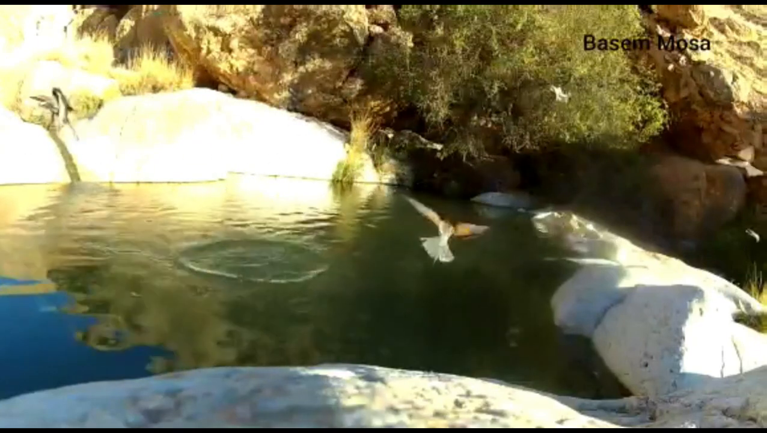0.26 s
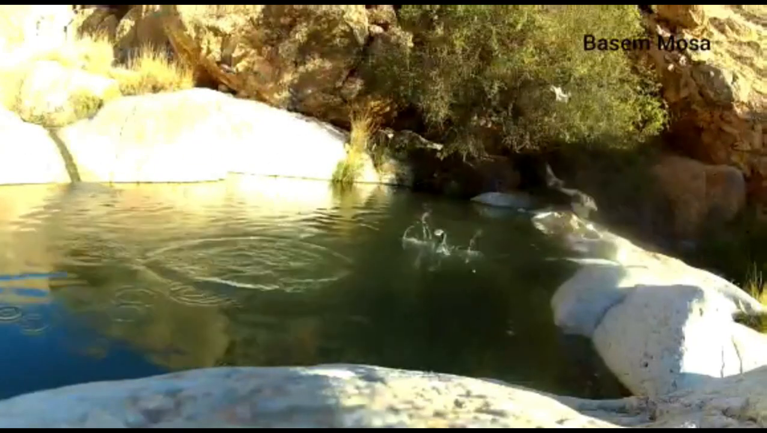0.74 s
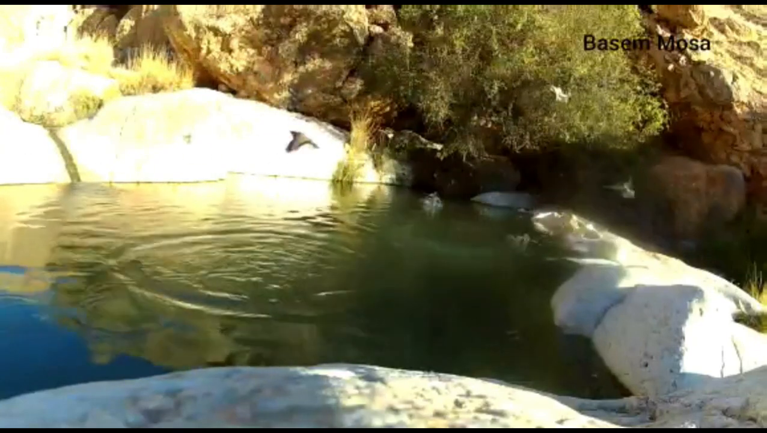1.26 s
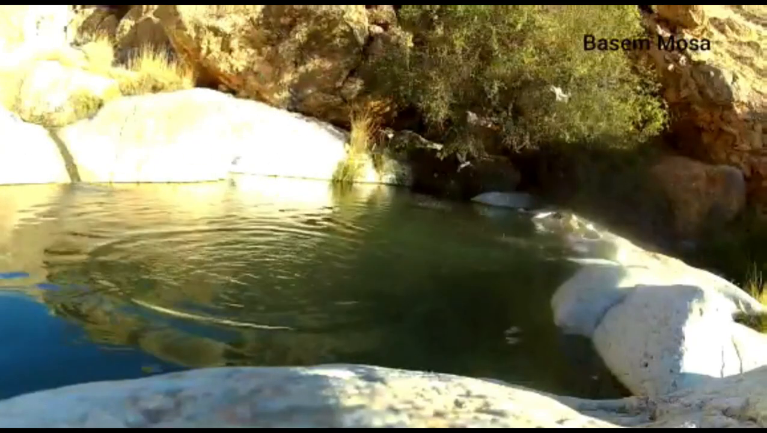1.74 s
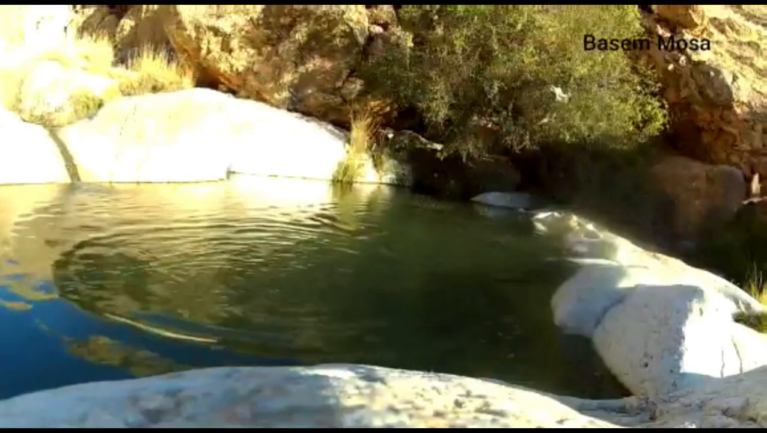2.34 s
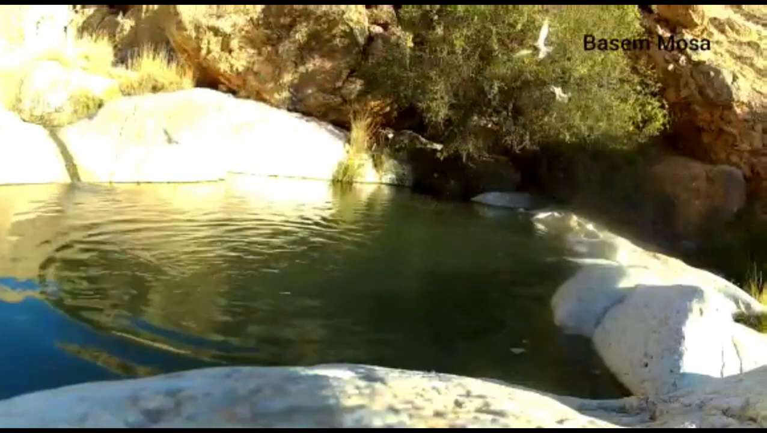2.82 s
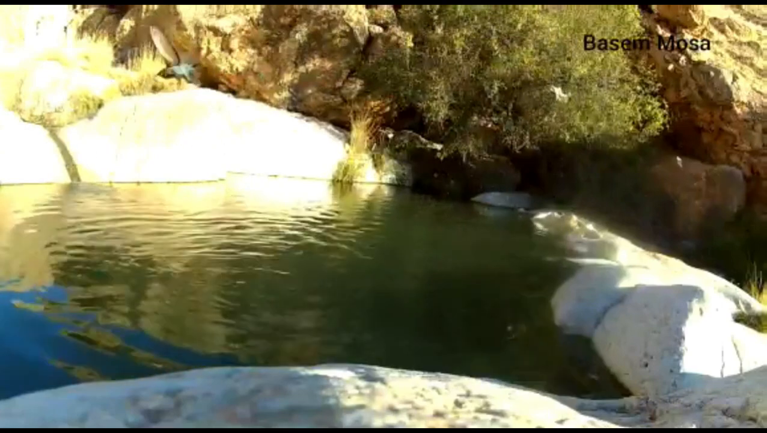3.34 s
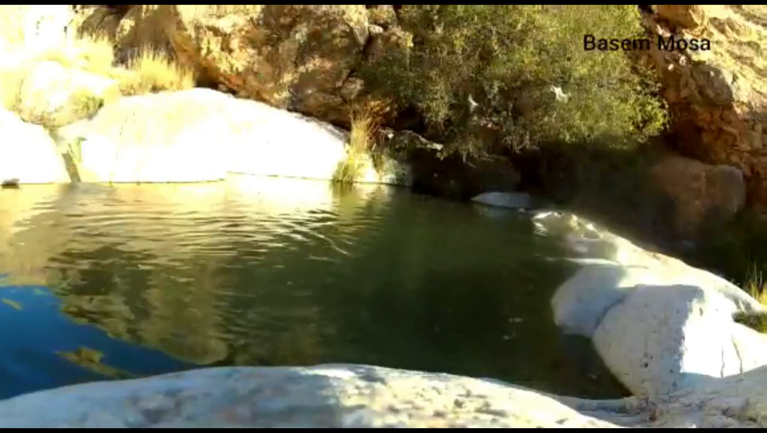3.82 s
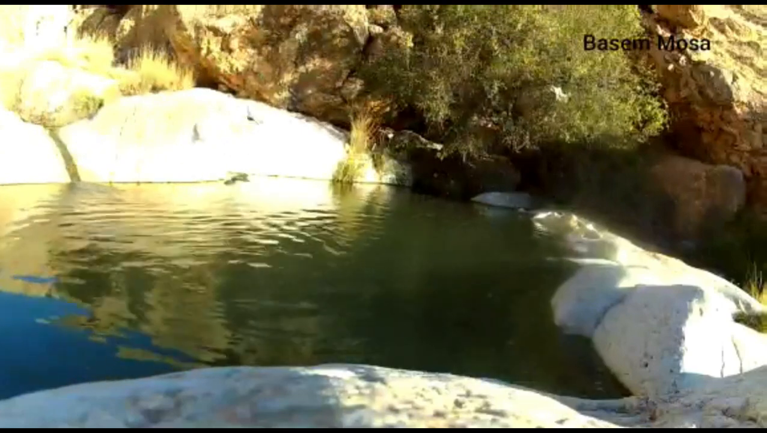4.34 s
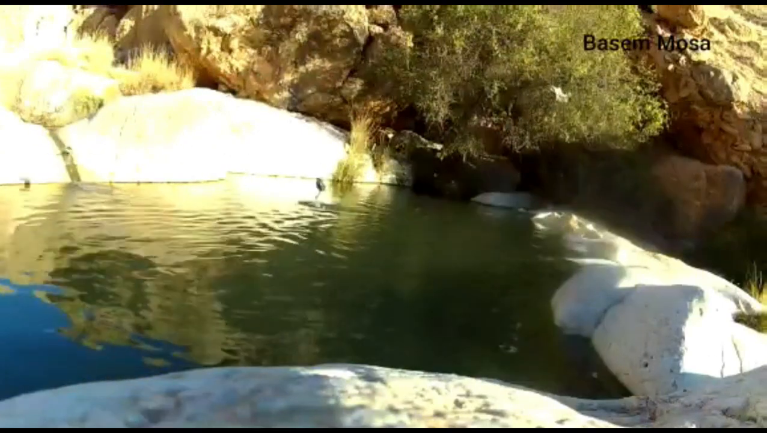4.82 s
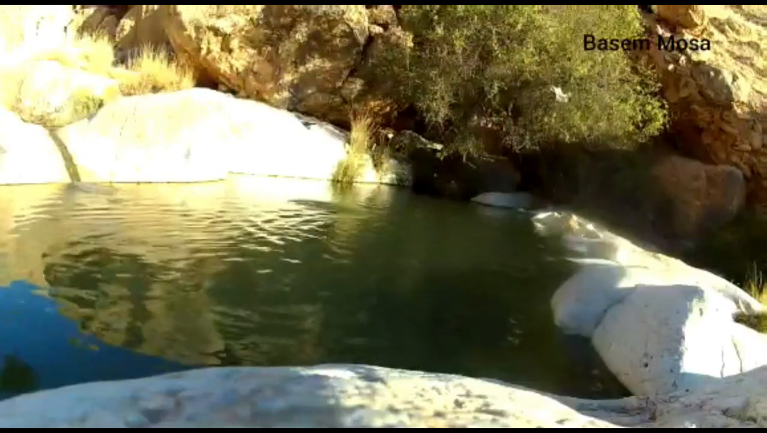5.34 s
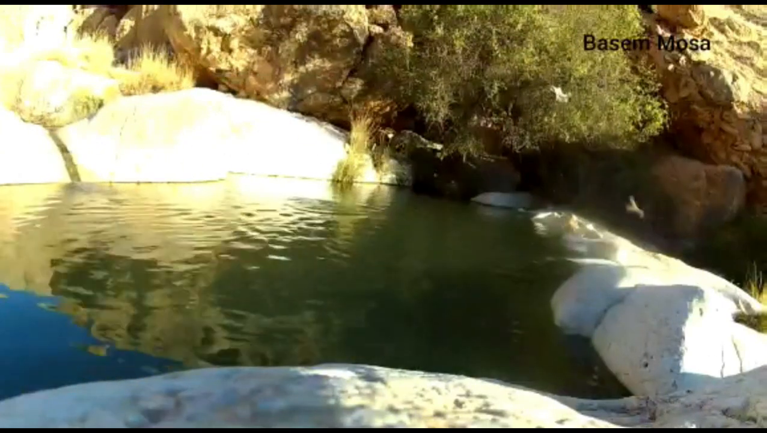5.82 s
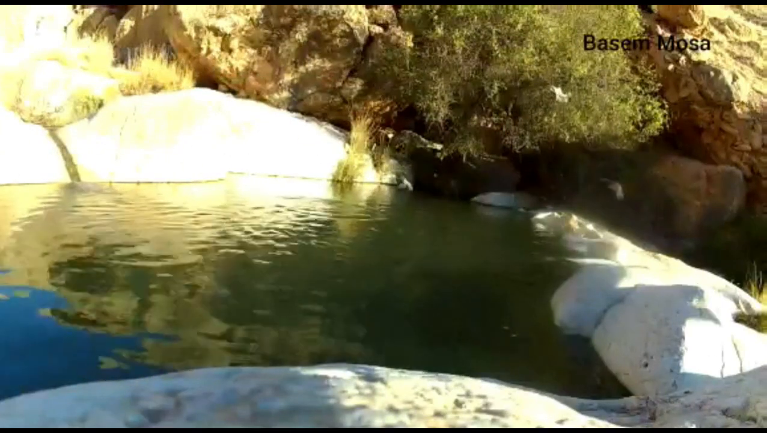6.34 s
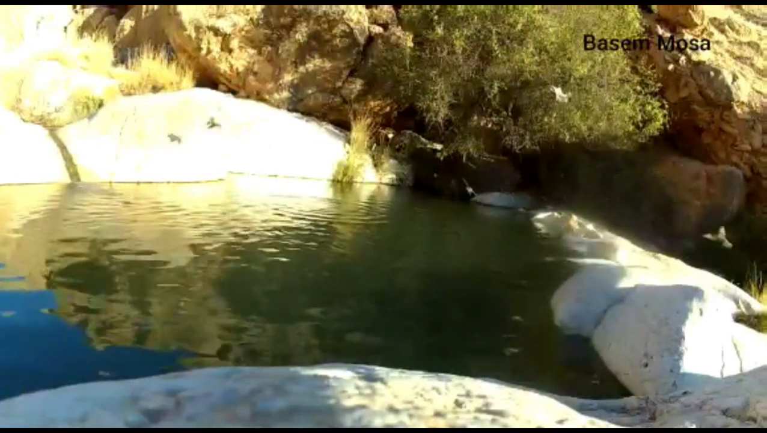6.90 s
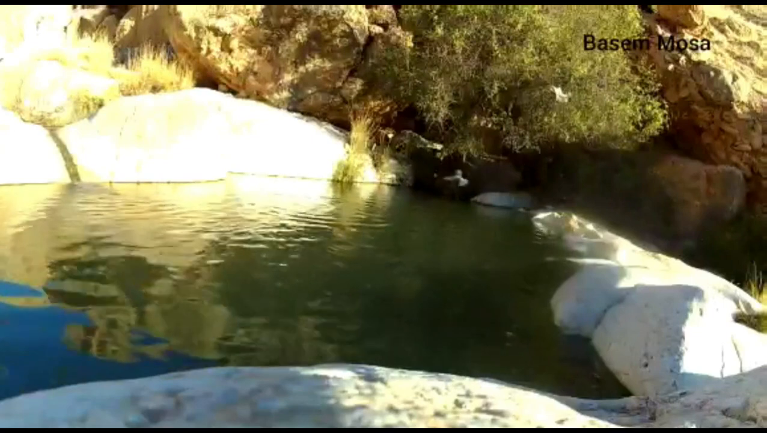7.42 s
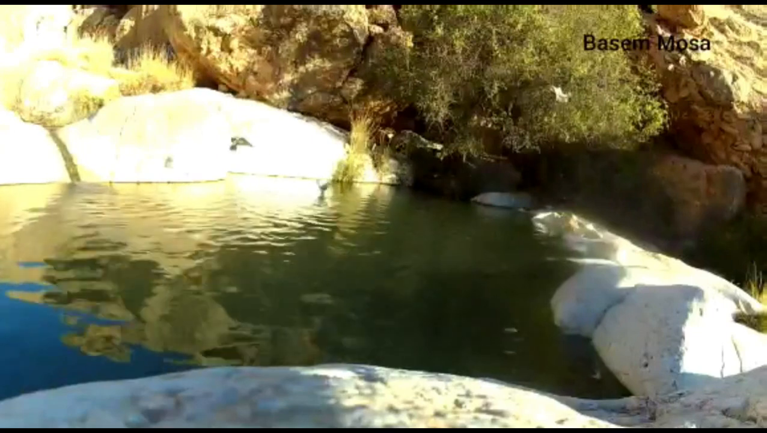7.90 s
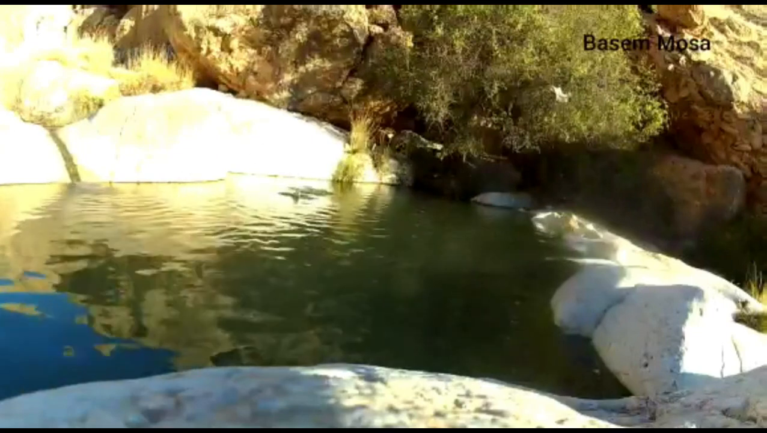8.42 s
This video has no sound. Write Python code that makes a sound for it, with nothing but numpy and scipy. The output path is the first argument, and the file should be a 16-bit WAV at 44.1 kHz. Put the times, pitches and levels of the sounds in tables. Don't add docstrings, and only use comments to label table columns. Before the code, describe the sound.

Brief liquid bird calls, near and far, echo off rocks above a softly rushing, trickling pool with sharp water clicks and microphone hiss.

```python
import sys
import numpy as np
from scipy import signal
from scipy.fft import rfft, irfft, next_fast_len
from scipy.io import wavfile
from scipy.ndimage import uniform_filter1d, map_coordinates

SR = 44100
rng = np.random.default_rng(int(sys.argv[2]) if len(sys.argv) > 2 else 0)


def unload_audio(sound):
    columns = np.transpose(np.atleast_2d(sound))
    steps = np.round(np.clip(columns, -1, 1) * 32767)
    wavfile.write(sys.argv[1], SR, steps.astype(np.int16))


def amplitude_ratio(level_db):
    exponent = np.asarray(level_db, float) / 20
    return 10 ** exponent


N = 381906
T = np.arange(N) / SR

# pitch_hz, gain_db
FLIP_GAIN = [(1500, -12), (1900, 1.5), (2100, -1.5), (2450, 13)]
JUMP_S = .003


def unit(x):
    return x / np.sqrt(np.mean(x ** 2) + 1e-20)


def along(points, hz):
    f, v = np.transpose(points)
    return np.interp(np.log(hz + 1), np.log(f + 1), v)


def wobble(rate, size=N):
    knots = rng.standard_normal(int(size * rate / SR) + 4)
    return map_coordinates(knots, [np.arange(size) * rate / SR])


def add(track, s, x):
    part = track[round(s * SR):][:len(x)]
    part += x[:len(part)]


def band(hz, width, size=N):
    bell = np.exp(-.5 * ((np.fft.rfftfreq(size, 1 / SR) - hz) / width) ** 2)
    return unit(irfft(rfft(rng.standard_normal(size)) * bell, size))


def rush(spectrum, patchy_db, grains=0):
    z = signal.stft(rng.standard_normal(N) + grains, nperseg=512)[2]
    field = uniform_filter1d(rng.standard_normal(z.shape), size=6, axis=0)
    field = uniform_filter1d(field, size=8, axis=1)
    x = signal.istft(z * amplitude_ratio(patchy_db * unit(field)), nperseg=512)[1][:N]
    m = next_fast_len(N + 8192)
    colour = amplitude_ratio(along(spectrum, np.fft.rfftfreq(m, 1 / SR)))
    return unit(irfft(rfft(x, m) * colour, m)[:N])


def wind(strength_db):
    # pitch_hz, level_db (per Hz)
    rumble = [(12, -34), (20, -5.5), (64, -0.5), (130, -7.5), (170, -46), (290, -120)]
    return amplitude_ratio(strength_db + 2.5) * rush(rumble, patchy_db=.3)


def gurgle(lapping_db):
    # pitch_hz, level_db (per Hz)
    slosh = [(76, -27), (130, -2), (221, -1), (279, -1), (308, -1), (354, -13.5), (560, -8.5), (730, -31),
             (1230, -120)]
    mean_db = lapping_db.mean()
    swing_db = 1.25 * (lapping_db - mean_db)
    return amplitude_ratio(swing_db + mean_db + 1.6 + 2.4 * wobble(38)) * rush(slosh, patchy_db=0.05)


def wash(water_db, flutter):
    # pitch_hz, level_db (per Hz)
    water = [(220, -26), (380, -1), (507, -4.5), (610, -2), (661, -2.5), (893, -2), (1610, -3.5),
             (1850, -2.5), (3370, -14), (3960, -16), (6000, -23.5), (7800, -45), (13200, -120)]
    return amplitude_ratio(water_db + 2.5 + 0.42 * flutter + 0.23 * wobble(25)) * rush(water, patchy_db=1.47)


def hollow(water_db):
    # pitch_hz, width_hz, level_db (relative to the water)
    pocket = (1100, 96, -9.5)
    hz, width, db = pocket
    return amplitude_ratio(water_db + db + 3 * wobble(13)) * band(hz, width)


def hiss(hiss_db, flutter):
    # pitch_hz, level_db (per Hz)
    treble = [(2350, -62), (4000, 0), (4750, -8.5), (6930, -6), (8180, -6), (9120, -8), (11700, -7.5),
              (15100, -8.5), (15700, -9.5)]
    spray = (rng.random(N) < 90 / SR) * rng.standard_normal(N) * 6
    sizzle = .2 * flutter + .7 * wobble(24) + .7 * wobble(60)
    return amplitude_ratio(hiss_db + 3.5 + sizzle) * rush(treble, patchy_db=1.6, grains=spray)


def whine():
    # pitch_hz, width_hz, level_db
    tones = [(10020, 8, -83), (13680, 80, -77)]
    return sum(amplitude_ratio(db + 1.5 * wobble(12)) * band(hz, width) for hz, width, db in tones)


def background():
    # time_s, level_db
    breeze = [(0.0, -55), (0.53, -54), (1.88, -56), (2.12, -54), (3.18, -57), (3.62, -56), (3.96, -58),
              (4.85, -59), (4.99, -54), (5.62, -53), (5.76, -58), (6.32, -56), (6.73, -59), (7.07, -56),
              (8.05, -59), (8.66, -55)]
    # time_s, level_db
    waves = [(0.0, -51), (0.58, -53), (1.74, -50), (2.65, -52), (2.87, -56), (3.52, -53), (3.81, -55),
             (4.12, -54), (4.72, -55), (5.5, -52), (6.1, -56), (6.39, -53), (6.49, -55), (8.01, -56),
             (8.47, -52), (8.66, -54)]
    wind_db = np.interp(T, *np.transpose(breeze))
    lapping_db = np.interp(T, *np.transpose(waves))
    water_db = -47.2 + .25 * (lapping_db - lapping_db.mean())
    hiss_db = -60.5 + .25 * (wind_db - wind_db.mean())
    flutter = wobble(9)
    pool = gurgle(lapping_db) + wash(water_db, flutter) + hollow(water_db)
    return wind(wind_db) + pool + hiss(hiss_db, flutter) + whine()


def bubbles(rows, rise, attack):
    out = np.zeros(N)
    for s, db, hz, t60 in rows:
        t = np.arange(round(t60 * SR)) / SR
        shape = amplitude_ratio(db - 60 * t / t60) * (1 - np.exp(-t / attack))
        add(out, s, shape * np.sin(2 * np.pi * hz * t * (1 + rise * t / t60)))
    return out


def circuit_pips():
    # start_s, peak_db, pitch_hz
    pips = [(0.2498, -48, 15600), (0.389, -44, 14400), (1.2351, -47, 15600), (1.4371, -51, 14400),
            (2.2104, -47, 15600), (3.2515, -47, 15600), (3.5374, -51, 14300), (4.1859, -40, 15600),
            (4.4378, -46, 14300), (4.802, -45, 14600), (6.5465, -52, 14400), (7.447, -48, 14300),
            (8.2257, -46, 15700), (8.4876, -51, 14400)]
    return 1.4 * bubbles([(*row, .04) for row in pips], rise=.001, attack=0.0043)


def trickle(count, low_hz, high_hz, cycles, db):
    u = rng.random((count, 3))
    start = u[:, 0] * T[-1]
    hz = low_hz * (high_hz / low_hz) ** u[:, 1]
    level = db + 9 * u[:, 2] ** 2
    return bubbles(np.c_[start, level, hz, cycles / hz], rise=.15, attack=0.0052)


def trickles():
    middle = trickle(count=220, low_hz=503, high_hz=1500, cycles=50, db=-51)
    deep = trickle(count=120, low_hz=164.4, high_hz=604, cycles=25, db=-52)
    mist = trickle(count=400, low_hz=3500, high_hz=15500, cycles=150, db=-65)
    return middle + deep + mist


def plops():
    # start_s, peak_db, pitch_hz, t60_s
    closing = [(3.703, -26, 970, 0.037), (3.932, -35.5, 794, 0.16), (4.012, -32, 575, 0.075),
               (4.036, -29.5, 584, 0.11), (4.69, -33, 247, 0.059), (4.931, -25, 1800, 0.023),
               (4.94, -30, 1050, 0.035), (.17, -30, 1060, 0.053), (1.937, -40, 3700, .015),
               (6.085, -36, 616, .1), (6.21, -34.5, 908, 0.11), (6.58, -32.5, 594, 0.054),
               (6.695, -28, 1300, 0.038), (.721, -29, 3500, 0.017), (1.386, -22, 2410, 0.014),
               (1.484, -31, 3600, 0.012), (1.588, -31, 3580, .011), (1.596, -29, 3150, 0.012),
               (4.075, -40, 790, .07), (8.12, -29, 1750, 0.036), (8.228, -35, 1190, 0.055),
               (5.305, -34, 1090, .06)]
    return bubbles(closing, rise=0.11, attack=0.0027)


def cracks(rows, t60, db):
    out, t = np.zeros(N), np.arange(200) / SR
    for s, level, _ in rows:
        snap = np.diff(rng.standard_normal(len(t) + 1))
        add(out, s, amplitude_ratio(level + db - 60 * t / t60) * snap)
    return out


def droplets():
    # start_s, peak_db, pitch_hz
    ticks = [(0.1027, -44, 9030), (0.4908, -49, 4690), (0.6639, -44, 5760), (0.7178, -45, 4520),
             (0.7696, -37, 8290), (0.8799, -39, 4910), (0.9378, -41, 5060), (1.0555, -43, 6390),
             (1.2306, -43, 4930), (1.3977, -42, 5580), (1.5364, -35.5, 5100), (1.9939, -44, 4820),
             (2.5027, -41, 5370), (3.5034, -41, 4500), (3.7599, -46, 4620), (4.8514, -43, 7040),
             (5.3892, -43, 5810), (6.3769, -40, 8330), (6.4867, -49, 4870), (6.6504, -43, 8660),
             (7.6245, -40, 8080), (8.3439, -40, 4780)]
    rings = 2.0 * bubbles([(*row, .005) for row in ticks], rise=.02, attack=.0003)
    return rings + cracks(ticks, t60=.004, db=-9.5)


def splashes():
    # start_s, length_s, centre_hz, level_db
    touches = [(.58, 0.13, 11000, -66), (0.744, .22, 7600, -60), (0.658, 0.33, 11000, -65),
               (1.42, .1, 11000, -70), (1.504, .32, 6260, -65), (3.47, 0.068, 9000, -62),
               (4.86, 0.15, 6500, -61), (5.622, 0.22, 11000, -65.5), (8.423, 0.14, 9000, -71)]
    out = np.zeros(N)
    for s, length, hz, db in touches:
        size = round(length * SR)
        gain = amplitude_ratio(db + 3 * wobble(70, size)) * np.hanning(size) ** .5
        add(out, s, gain * band(hz, 0.15 * hz, size))
    return out


def flaps():
    # start_s, length_s, level_db
    passes = [
        (.5, .45, -54),
        (1.25, .3, -55),
        (8.305, .25, -50),
    ]
    beats_per_s = 20
    out = np.zeros(N)
    for s, length, db in passes:
        t = np.arange(round(length * SR)) / SR
        beats = 2 * np.sin(np.pi * beats_per_s * t) ** 4
        puffs = beats * band(250, 110, len(t))
        add(out, s, amplitude_ratio(db + 2.5 * wobble(15, len(t))) * puffs)
    return out


def whistle(notes, overtone_db=0, octave_db=-99):
    # pitch_hz, level_db
    throat = [(3000, -38), (4000, -48), (5200, -34.5), (6000, -36.5), (8000, -58), (10000, -45),
              (12000, -54), (14000, -57), (15500, -47)]
    s, length, hz0, hz1, db0, db1 = np.transpose(notes)
    knots = np.maximum.accumulate(np.ravel([s, s + length], "F")) - s[0] + .002
    t = np.arange(round((knots[-1] + 0.0047) * SR)) / SR
    hz = uniform_filter1d(np.interp(t, knots, np.ravel([hz0, hz1], "F")), size=60)
    level_knots = np.r_[db0[0] - 30, np.ravel([db0, db1], "F"), db1[-1] - 30]
    level = np.interp(t, np.r_[0, knots, t[-1]], level_knots)
    shimmer = .3 * wobble(250, size=len(t))
    gain = amplitude_ratio(uniform_filter1d(level, size=30) + shimmer)
    phase = 2 * np.pi * np.cumsum(hz) / SR
    tone = np.sin(phase) + amplitude_ratio(octave_db) * np.sin(2 * phase)
    for k in range(2, 9):
        unsteady = 0.45 * k * wobble(97, size=len(t))
        db = overtone_db + along(throat, k * hz) + along(FLIP_GAIN, hz) + unsteady
        tone += amplitude_ratio(db) * np.sin(k * phase)
    return gain * tone


def rocks(x, echoes, tail_db, t60=0.4, flip_share=0.49):
    t = np.arange(SR // 2) / SR
    tail = rng.standard_normal(len(t)) * amplitude_ratio(-60 * t / t60) * (1 - np.exp(-t / 0.0097))
    answer = amplitude_ratio(tail_db) * tail / np.linalg.norm(tail)
    for delay, db in echoes:
        answer[round(delay * SR)] += amplitude_ratio(db)
    hz = np.fft.rfftfreq(len(t), 1 / SR)
    colour = amplitude_ratio(flip_share * along(FLIP_GAIN, hz) * (hz < 3200))
    answer = irfft(rfft(answer) * colour, len(t))
    answer[0] += 1
    return signal.fftconvolve(x, answer)


def trill(s, period, hold_hz, top_hz, db):
    notes = [(s - .026, .02, .92 * hold_hz, hold_hz, db - 13, db - 3)]
    for k in range(4):
        top = top_hz * .975 ** k
        hold_hz *= 1 + .015 * rng.standard_normal()
        db += rng.normal(0, 1)
        notes.append((s + k * period - .003, .006, top, .97 * top, db - k, db - k))
        notes.append((s + (k + .36) * period, .38 * period, hold_hz, hold_hz, db - k - 1, db - k - 2))
    return notes


def chirp(s, rise, start_hz, top_hz, db):
    hook_s, edge_db = .006, db - 14
    top_s = s + rise
    return [(s, rise, start_hz, .92 * top_hz, edge_db, db - 4),
            (top_s, hook_s, top_hz, top_hz, db, db - 3.5),
            (top_s + hook_s, hook_s, .95 * top_hz, .9 * top_hz, db - 7, edge_db)]


def roll(lead, *flips, scoop=.8, sag=-.01, swell_db=.8, kick_db=-1.5, fall_s=.011):
    scoop_s = .0045
    kick_s, kick = .0055, 1.045
    flip_s, flip_sag, flip_swell_db = .0055, .915, 2.5
    s, hz0, hz1, db0, db1 = lead
    bend = flips[0][0] - JUMP_S - kick_s
    start = s + scoop_s + JUMP_S
    middle_hz = hz0 + .66 * (hz1 - hz0)
    notes = [(s, scoop_s, scoop * hz0, .965 * hz0, db0 - 13.5, db0 - 2.5),
             (start, (bend - start) / 2, hz0, middle_hz, db0, (db0 + db1) / 2),
             (bend, kick_s, hz1, kick * hz1, db1, db1 + kick_db)]
    for (s, top, flip_db, *held), after in zip(flips, [*flips[1:], None]):
        notes.append((s, flip_s, top, flip_sag * top, flip_db - flip_swell_db, flip_db + flip_swell_db))
        s += flip_s + JUMP_S
        if after is None:
            hz, db = held
            fall_hz_per_s = 60000
            end_hz = hz - fall_hz_per_s * fall_s
            end_db = db - 1050 * fall_s
            notes += [(s - JUMP_S / 2, JUMP_S, hz, hz - fall_hz_per_s * JUMP_S, db - 2, db),
                      (s + fall_s, 0, end_hz, end_hz, end_db, end_db)]
        elif held:
            hz, db = held
            stop = max(after[0] - JUMP_S / 2, s + JUMP_S)
            bend = max(stop - kick_s, s + JUMP_S)
            low_hz, soft_db = (1 + sag) * hz, db - swell_db
            notes += [(s, JUMP_S, (1.05 + sag) * hz, low_hz, soft_db + 1.6, soft_db),
                      (s + JUMP_S, bend - s - JUMP_S, low_hz, hz, soft_db, db),
                      (bend, stop - bend, hz, (1 + kick) / 2 * hz, db, db + .7)]
    return notes


def birds():
    # held_hz, held_db
    first = [(1.401, 1760, 1950, -36, -28), (1.433, 2860, -38), (1.440, 2430, -42, 2000, -29.5),
             (1.452, 2250, -40, 2060, -29), (1.463, 2100, -40, 2000, -27), (1.481, 2000, -36, 1900, -30)]
    second = [(1.558, 1975, 2020, -27, -22), (1.608, 2750, -35, 1945, -23),
              (1.6465, 2560, -29, 1930, -24.5), (1.6815, 2250, -38, 1930, -24),
              (1.708, 2250, -33, 2000, -29)]
    third = [(2.4765, 1920, 2030, -25, -25.5), (2.518, 2685, -28.5), (2.5295, 2735, -25, 1933, -21.5),
             (2.557, 2506, -28, 1960, -22), (2.5845, 2550, -31, 1970, -29)]
    fourth = [(4.294, 1818, 1960, -40, -38), (4.334, 2520, -40), (4.347, 2480, -44, 1950, -39.5),
              (4.383, 2400, -47, 1880, -42), (4.406, 2200, -52, 2080, -43)]
    near = [
        (5.736, 1868, 2005, -11.5, -4),
        (5.7875, 2640, -19.5),
        (5.7965, 2660, -24, 1950, -11.5),
        (5.8245, 2580, -19, 1915, -9.7),
        (5.8515, 2480, -30, 2130, -15.5),
    ]
    twitter = [(6.585, 1900, 2100, -48, -47), (6.601, 2350, -45), (6.612, 2280, -43, 1960, -47),
               (6.641, 2450, -45, 2060, -52)]
    # delay_s, level_db
    first_echo = [(.012, -16), (.035, -17)]
    second_echo = [(.019, -17), (.045, -17)]
    third_echo = [(.011, -11), (.052, -11.5)]
    near_echo = [(.009, -40), (.048, -39)]
    # start_s, length_s, pitch_hz, level_db
    lingers = [
        (2.516, .0084, 2060, -23),
        (1.619, .018, 2720, -35.5),
    ]
    # start_s, rise_s, start_hz, top_hz, level_db
    rising = (6.348, .017, 1237, 2090, -25)
    peeps = [(4.752, .016, 1400, 1900, -43), (5.082, .014, 1305, 2020, -41)]
    # first_flip_s, period_s, held_hz, top_hz, level_db
    trills = [(3.695, 0.018, 2033, 2300, -43.5), (4.755, 0.023, 2210, 2780, -44),
              (5.180, 0.021, 2190, 2770, -40), (7.88, 0.027, 1980, 2250, -44.5),
              (8.03, .035, 2026, 2300, -46)]
    out = np.zeros(N)

    def sing(notes, echoes, tail_db, t60=.4, share=.49, **voice):
        call = whistle(notes, **voice)
        add(out, notes[0][0] - .002, rocks(call, echoes, tail_db, t60, share))

    sing(roll(*near, scoop=.74, kick_db=-3.5, fall_s=.013), near_echo, tail_db=-25.5, t60=.6, share=.9)
    sing(roll(*first, fall_s=.007), first_echo, tail_db=-9, share=.2, overtone_db=-2)
    sing(roll(*second, scoop=.97, sag=.075, swell_db=-3, kick_db=2.5, fall_s=.007),
         second_echo, tail_db=-14.5, t60=.3, share=.9, overtone_db=-8)
    sing(roll(*third, swell_db=4.5, kick_db=1.5, fall_s=.007),
         third_echo, tail_db=-13, t60=.28, share=.05, overtone_db=-16, octave_db=-31)
    for s, length, hz, db in lingers:
        sing([(s, length, 1.02 * hz, .98 * hz, db, db)], [], tail_db=-14, t60=.2)
    sing(roll(*fourth, fall_s=.007), [(.016, -7)], tail_db=-11, share=.2)
    sing(roll(*twitter), [], tail_db=-7, octave_db=-5.5)
    sing(chirp(*rising), [], tail_db=-12, octave_db=-12.5)
    for row in peeps:
        sing(chirp(*row), [], tail_db=-8)
    for row in trills:
        tail_db = -49.5 - row[-1]
        sing(trill(*row), [(.078, -9)], tail_db, t60=.59, share=.1)
    return out


def scene():
    water = trickles() + plops() + droplets() + splashes()
    return (background() + circuit_pips() + water + flaps() + birds())[None]


def band_limit(x):
    return signal.sosfilt(signal.butter(12, 15900, fs=SR, output="sos"), x)


def record(dry):
    after = np.clip(T - 5.8, 0, None)
    duck = amplitude_ratio(-1.5 * (T > 5.87) * np.exp(-after / 0.11))
    passband = np.fft.rfftfreq(N, 1 / SR) < 15740
    limited = irfft(rfft(dry * duck) * passband, N)
    return band_limit(limited)


dry = scene()
out = record(dry)
unload_audio(out)
```